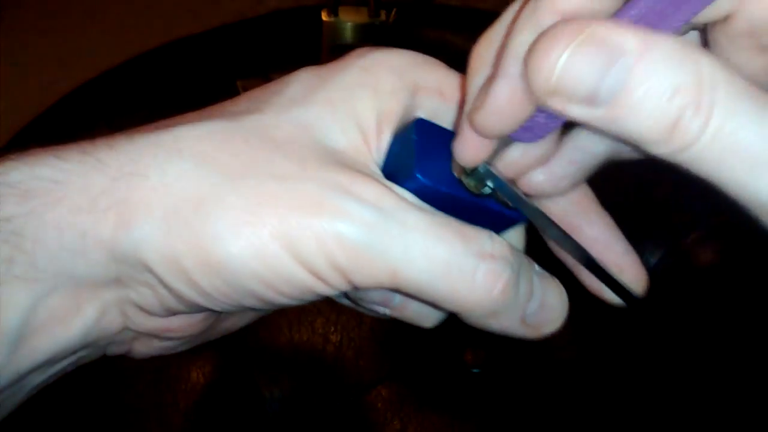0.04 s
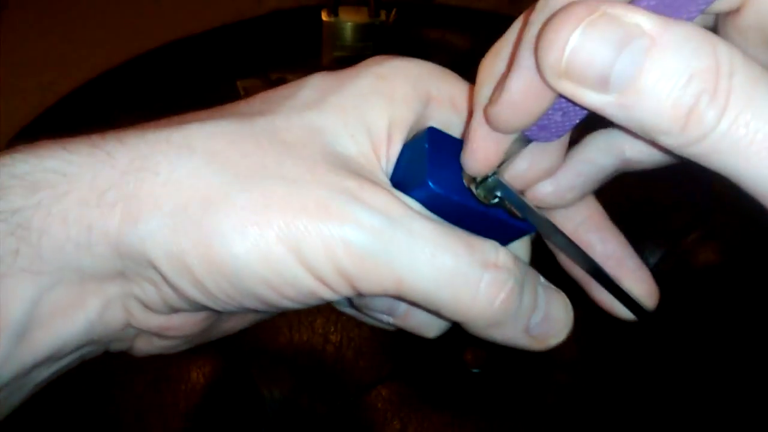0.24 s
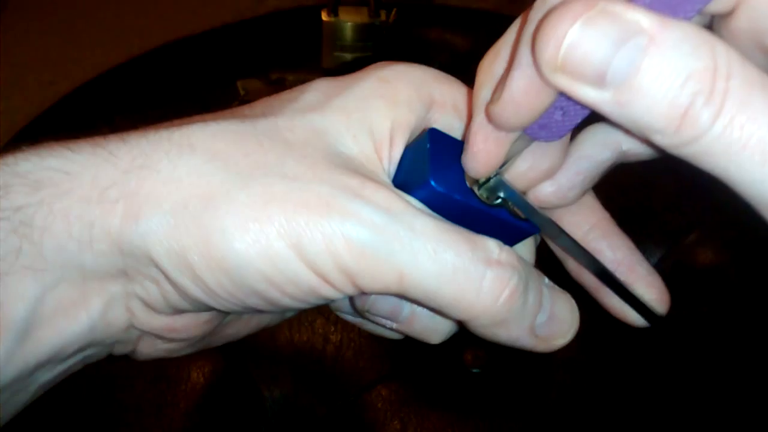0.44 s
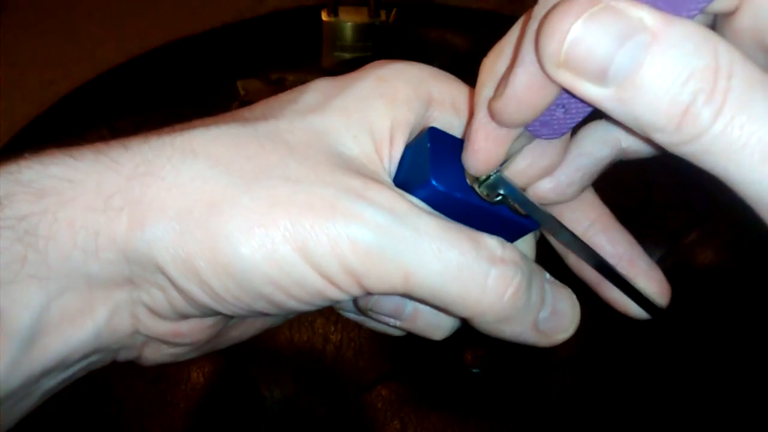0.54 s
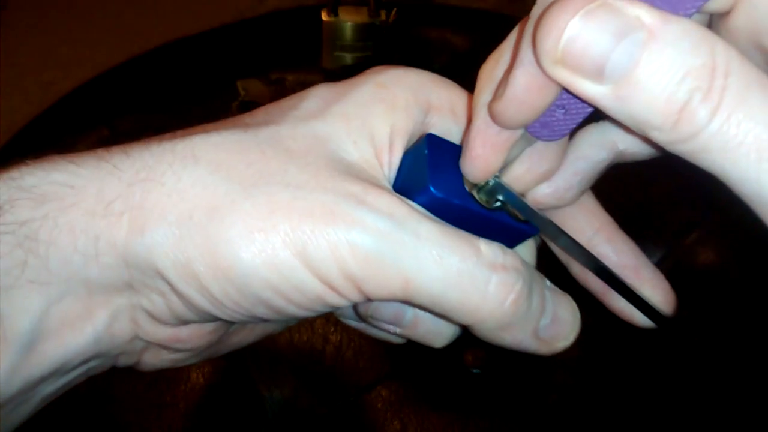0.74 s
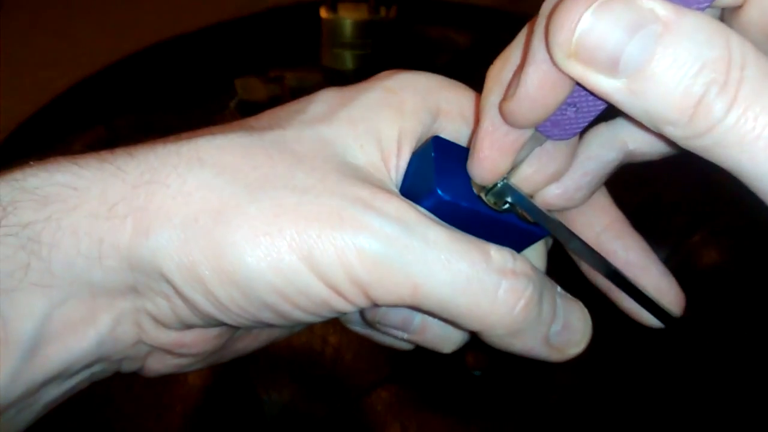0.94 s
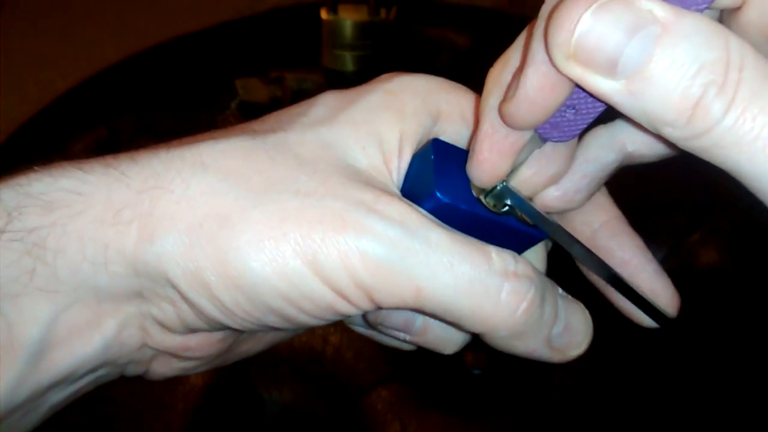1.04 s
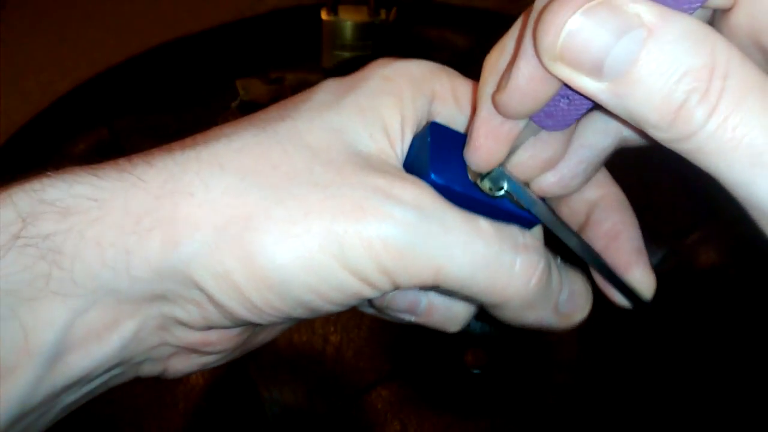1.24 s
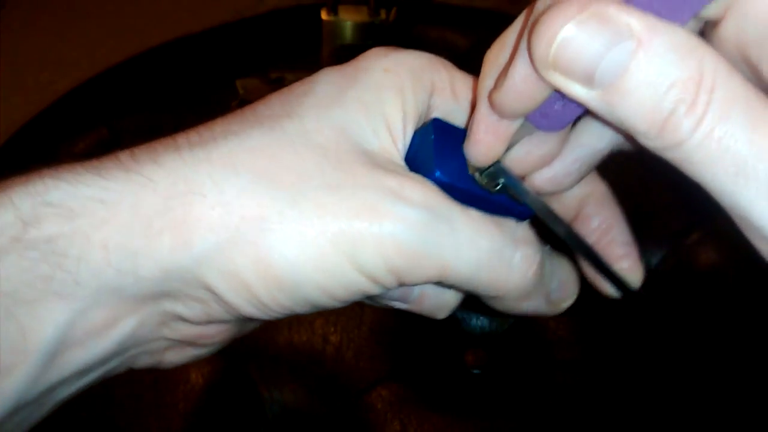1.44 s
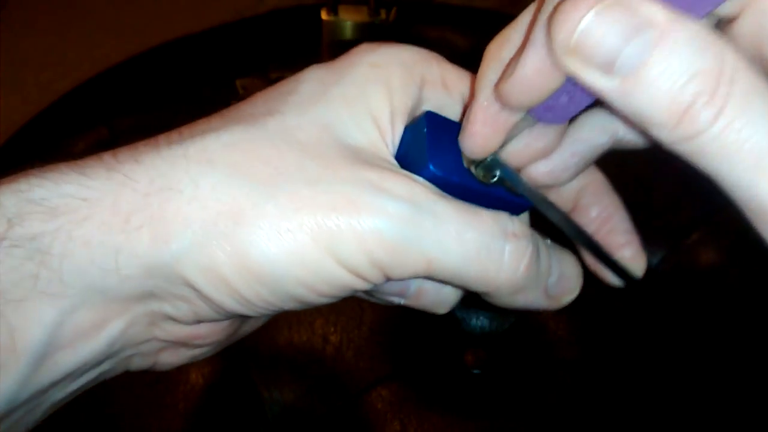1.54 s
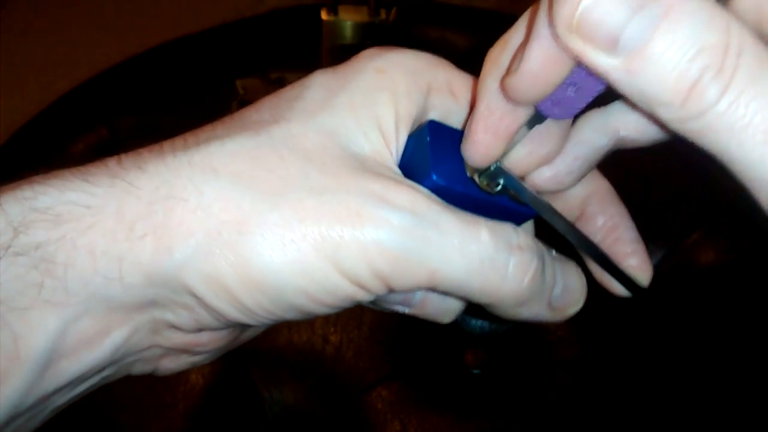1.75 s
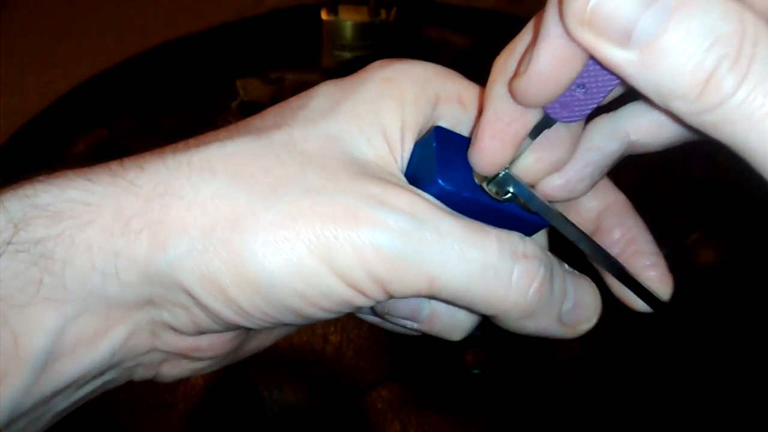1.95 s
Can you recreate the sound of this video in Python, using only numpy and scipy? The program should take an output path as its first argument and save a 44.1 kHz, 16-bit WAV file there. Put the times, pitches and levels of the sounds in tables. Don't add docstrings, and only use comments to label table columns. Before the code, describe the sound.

A small padlock being picked: sparse sharp steel ticks, one much louder, in a quiet room

```python
import sys
import numpy as np
from scipy import signal
from scipy.fft import rfft, irfft
from scipy.io import wavfile
from scipy.ndimage import uniform_filter1d

SR = 44100
rng = np.random.default_rng(int(sys.argv[2]) if len(sys.argv) > 2 else 0)


def pcm_store(signal):
    levels = np.round(np.clip(np.atleast_2d(signal), -1, 1) * 32767)
    wavfile.write(sys.argv[1], SR, levels.astype(np.int16).T)


def magnitude_from_level(level_db):
    exponent = np.asarray(level_db, float) / 20
    return 10 ** exponent


N = 88200
T = np.arange(N) / SR
HZ = np.fft.rfftfreq(N, 1 / SR)

# frequency in Hz, level in dB per Hz.
MIC_HISS = [(20, -55.5), (45, -65.5), (90, -80.5), (120, -79.5), (350, -85.5), (1000, -97.5), (3000, -102),
            (15000, -104)]
# frequency in Hz, front microphone level in dB, back microphone level in dB,
# how far the back one trails in radians, size of the loudness sway in dB.
HOUSE_HUM = [(45, -91, -53.5, 2.4917, -0.5), (45.8, -89.5, -65, 3.3, 4.5), (74.23, -57, -58.5, 0.18, 4),
             (79.67, -65.5, -64.5, 0.24, 0), (91.222, -59, -60, 0.31, -4),
             (297.34, -65, -68.5, 0.6633, 1.5)]
# frequency in Hz, level in dB, time to fall 60 dB in seconds.
PICK_STEEL = [(6050, -6.5, 0.002643), (8232.1, -15, 0.00981), (9431.3, -12.5, 0.00733),
              (10779, -8.5, 0.0032), (12564, -13.5, 0.00669), (14024, -14.5, 0.00826)]
# frequency in Hz, level in dB, time to fall 60 dB in seconds.
TENSION_TOOL = [(3265.1, -12.5, 0.1672), (3482.1, 3.5, 0.15206), (3500, -3, 0.287), (3605.6, -12, 0.4059),
                (3582.9, -5.5, 0.3111), (3852, -11, 0.258), (4450, -14, 0.36), (5391, -21.5, 0.12),
                (5880, -17, 0.14)]
# start in seconds, ring frequency in Hz, ring level in dB,
# ring fall time in seconds, snap level in dB.
PIN_CONTACTS = [(.0316, 5700, -40, 0.000588, -44), (.0333, 5365, -44, 0.000497, -43),
                (.0347, 4006, -54, 0.001764, -28), (.0362, 5772, -34.5, 0.0008135, -46.5),
                (.0380, 5483, -43, 0.000786, -51), (.0508, 3782, -49, 0.001533, -62.5),
                (.1405, 2995, -43.5, 0.000416, -56.5), (.2229, 6050, -27, 0.0002432, -20.5),
                (.2234, 5377, -26.5, 0.000925, -22), (.2237, 5950, -15.5, 0.0008997, -12.5),
                (.2243, 3693, -19.5, 0.0009418, -32), (.2246, 4148, -21.5, 0.0002436, -23.5),
                (.2249, 4853, -31, 0.0012, -54), (.2264, 3440, -40.5, 0.000763, -42),
                (.2298, 3612, -41, 0.000676, -36), (.2385, 3613, -45.5, 0.000778, -38.5),
                (.2420, 4514, -40, .0008, -35), (.7028, 3417, -37, 0.0007325, -34.5),
                (.7036, 5255, -35.5, 0.000558, -31), (0.7034, 3327, -51.5, 0.000389, -42.5),
                (.7045, 3687, -46.5, 0.0008832, -39), (0.9906, 3794, -31, 0.0006776, -51.5),
                (.9910, 5575, -35.5, 0.0009715, -35.5), (0.9925, 4500, -21, 0.0002917, -33.5),
                (.9915, 6303, -41, 0.0006725, -45), (0.9914, 3612, -40, 0.0007193, -47),
                (.9942, 4379, -58.5, 0.000495, -53.5), (1.590, 3500, -59, 0.000606, -54.5),
                (1.6772, 3801, -45.5, 0.001278, -58.5), (1.6787, 5213, -45.5, 0.001464, -40.5),
                (1.6799, 3800, -46.5, 0.0014745, -36.5), (1.6812, 4113, -52, 0.000843, -59.5)]
# start in seconds, frequency in Hz, level in dB,
# time to fall 60 dB in seconds.
BODY_KNOCKS = [(.0318, 1250, -51, 0.03145), (.0345, 1838, -60, 0.0228), (.1402, 1202, -44, 0.00607),
               (0.1399, 1787, -40.5, 0.00672), (.2229, 1898, -30.5, 0.015645), (.2231, 1204, -36, 0.03917),
               (.2234, 2037, -56, 0.0116), (.2236, 2833, -30, 0.01973), (0.2243, 897, -37.5, 0.01031),
               (.2244, 1464, -40.5, 0.01992), (.2242, 421.8, -49.5, 0.0529), (.7027, 1236, -56.5, 0.02986),
               (.7029, 2182, -39.5, 0.01602), (.7033, 2671, -42.5, 0.0154), (.9900, 987.1, -40.5, 0.01387),
               (.9908, 1173, -55, 0.01552), (.9912, 1712, -50.5, 0.0239), (.9912, 3226, -47, 0.01441),
               (1.6775, 1267, -53, 0.0408), (1.6795, 995.7, -56, 0.02288), (1.6795, 2796, -55, 0.0218)]
# start in seconds, level in dB,
# pitch factor (1 = unchanged).
TOOL_STRIKES = [
    (0.033, -66.5, 0.9492),
    (.2246, -45, 1.001),
    (0.9916, -62.5, 1.085),
    (1.680, -66, 0.855),
]
VOLUME_DRIFT = [(0, -2.1128), (.3, 0), (.9, 0.027), (1.4, -.5), (1.7, -2), (2, -2)]


def late(x, delay_s, gain=1):
    return irfft(rfft(x) * gain * np.exp(-2j * np.pi * HZ * delay_s), N)


def lowpass(hz, q):
    return 1 / (1 - (HZ / hz) ** 2 + 1j * HZ / (hz * q))


def highpass(hz):
    return -(HZ / hz) ** 2 * lowpass(hz, 0.62644)


def modes(table, t, scatter_db=0.0):
    total = 0
    for hz, db, t60 in table:
        level = magnitude_from_level(db + scatter_db * rng.standard_normal())
        fade = magnitude_from_level(-60 * t / t60)
        total = total + level * fade * np.sin(2 * np.pi * hz * t)
    return total


def walk(rate_hz):
    step = int(SR / rate_hz)
    sway = np.repeat(rng.standard_normal(N // step + 1), step)
    sway = uniform_filter1d(uniform_filter1d(sway, step), step)[:N]
    return (sway - sway.mean()) / sway.std()


def microphone_hiss():
    hz, db = np.array(MIC_HISS).T
    port_bump_db = 1 * np.exp(-((HZ - 3800) / 1105) ** 2)
    front_db = np.interp(np.log(HZ + 1), np.log(hz), db) + port_bump_db
    back_db = front_db + 0.5458 * np.clip(HZ / 10000, 0, 1)
    gain = magnitude_from_level(np.array([front_db, back_db])) * np.sqrt(SR / 2)
    gain = gain * (HZ < 15520) * np.abs(highpass(26.843)) ** 4
    spectrum = rfft(rng.standard_normal((2, N))) * gain
    rumble_part = 1 / (1 + (HZ / 400) ** 2)
    rumble = irfft(spectrum * rumble_part, N) * magnitude_from_level(0.5 * walk(6.356))
    return rumble + irfft(spectrum * (1 - rumble_part), N)


def house_hum():
    out = np.zeros((2, N))
    for hz, front_db, back_db, phase, sway_db in HOUSE_HUM:
        angle = 2 * np.pi * (hz * T + 0.16 * walk(6))
        front = magnitude_from_level(front_db) * np.sin(angle)
        back = magnitude_from_level(back_db) * np.sin(angle - phase)
        out += magnitude_from_level(sway_db * walk(5.999)) * np.array([front, back])
    return out


def room(x):
    t60_s, build_up_s, level_db = 0.379, 0.005804, -14
    t = T[:SR // 2]
    tail = rng.standard_normal((2, len(t))) * magnitude_from_level(-60 * t / t60_s) * (1 - np.exp(-t / build_up_s))
    tail = tail / np.sqrt(np.sum(tail ** 2, axis=1, keepdims=True))
    echo = signal.fftconvolve(x[None], tail, axes=1)[:, :N]
    return magnitude_from_level(level_db) * late(echo, 0, lowpass(4500, 0.4498) * highpass(790))


def tension_tool():
    out = np.zeros(N)
    for start_s, db, pitch in TOOL_STRIKES:
        out += magnitude_from_level(db) * modes(TENSION_TOOL, np.maximum(T - start_s, 0) * pitch)
    return out


def body_knocks():
    out = np.zeros(N)
    for start_s, hz, db, t60 in BODY_KNOCKS:
        out += modes([(hz, db, t60)], np.maximum(T - start_s, 0))
    return out


def pin_contacts():
    ring_rise_s, snap_fall_s = 0.00014803, 0.00003
    out = np.zeros(N)
    for start_s, hz, ring_db, fall_s, snap_db in PIN_CONTACTS:
        first = int(start_s * SR)
        t = np.maximum(T[first:first + SR // 20] - start_s, 0)
        swell = 2 * (1 - np.exp(-t / ring_rise_s)) * np.exp(-t / fall_s)
        ring = swell * np.sin(2 * np.pi * hz * t)
        snap = np.exp(-t / snap_fall_s) * (t > 0) + modes(PICK_STEEL, t, 1.0743)
        out[first:first + len(t)] += magnitude_from_level(ring_db) * ring + magnitude_from_level(snap_db) * snap
    return out


def lock():
    metal = pin_contacts() + body_knocks() + tension_tool()
    return late(metal, 0, highpass(475.7) ** 2 * lowpass(16500, 0.7) ** 2)


def scene():
    near = lock()
    around_phone = magnitude_from_level(-6.5) * lowpass(5045.2, 1.1333) ** 3 + magnitude_from_level(-14)
    far = late(near, 0.0001, around_phone)
    return np.array([near, far]) + room(near) + microphone_hiss() + house_hum()


def top_cut(x):
    return signal.sosfilt(signal.butter(12, 16640, fs=SR, output="sos"), x)


def record(dry):
    front, back = dry
    bass = 0.55 + (1 - 0.55) * np.abs(highpass(500))
    left_share = 0.25 + (0.57 - 0.25) * np.abs(lowpass(3500, 0.7))
    right_share = 0.76 * lowpass(4380, 3) * lowpass(2550, 0.7)
    left = front - late(back, 0.000394, left_share * bass)
    right = back - late(front, 0.000282, right_share * bass)
    drift_s, drift_db = np.array(VOLUME_DRIFT).T
    mix = np.array([left, right]) * magnitude_from_level(np.interp(T, drift_s, drift_db))
    return top_cut(mix)


dry = scene()
out = record(dry)
pcm_store(out)
```